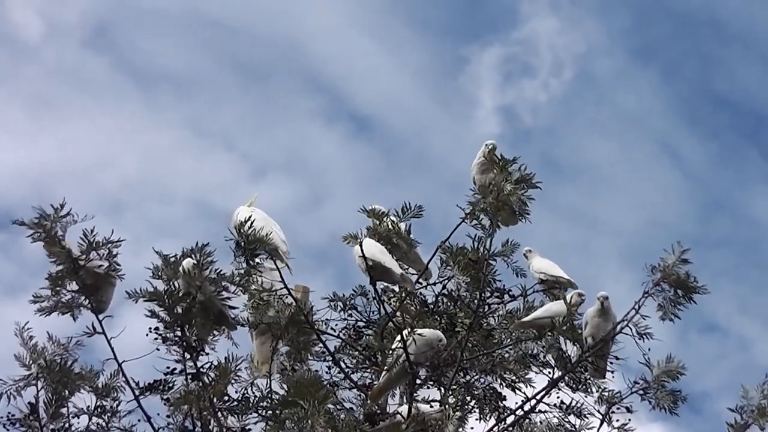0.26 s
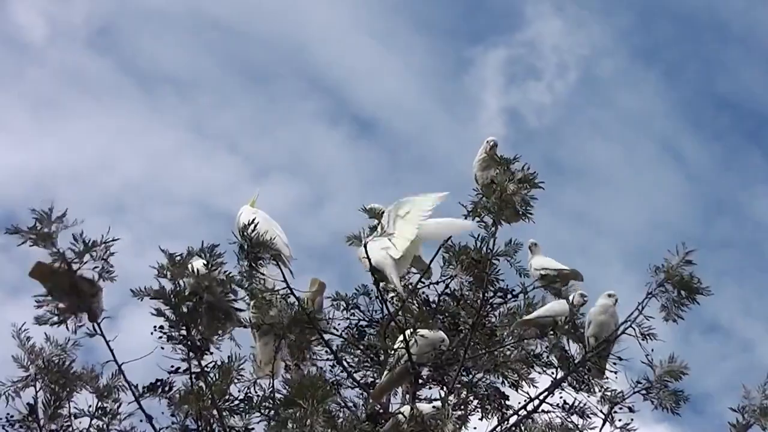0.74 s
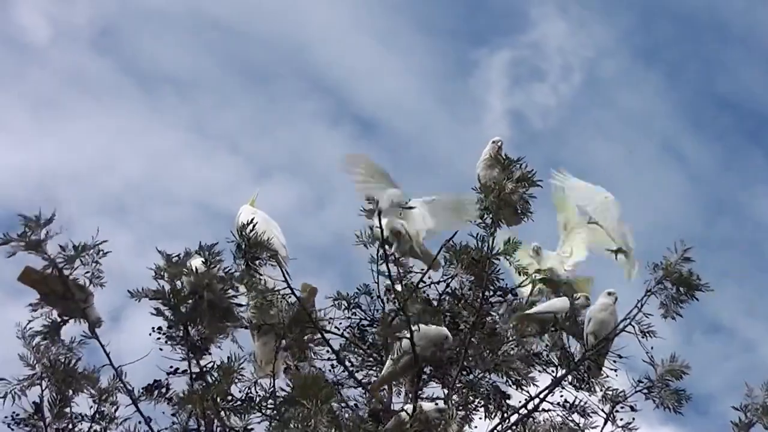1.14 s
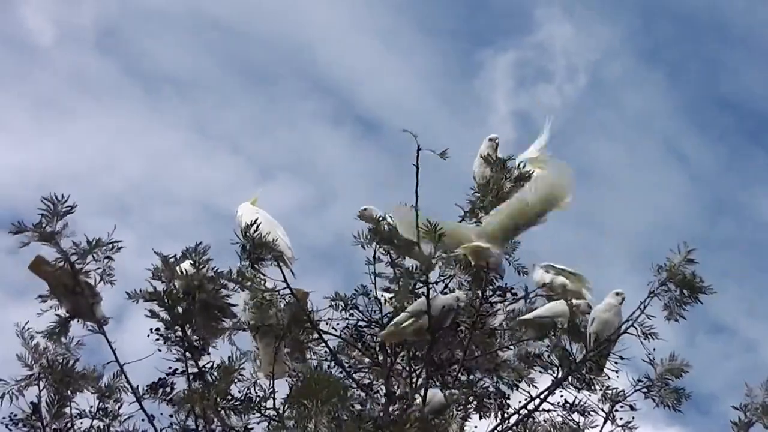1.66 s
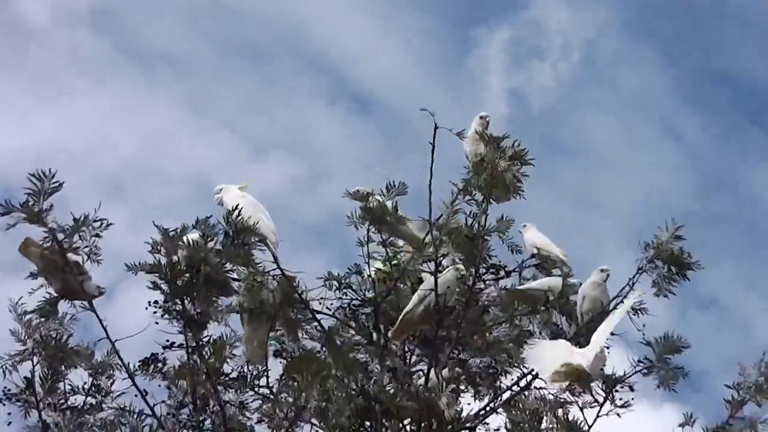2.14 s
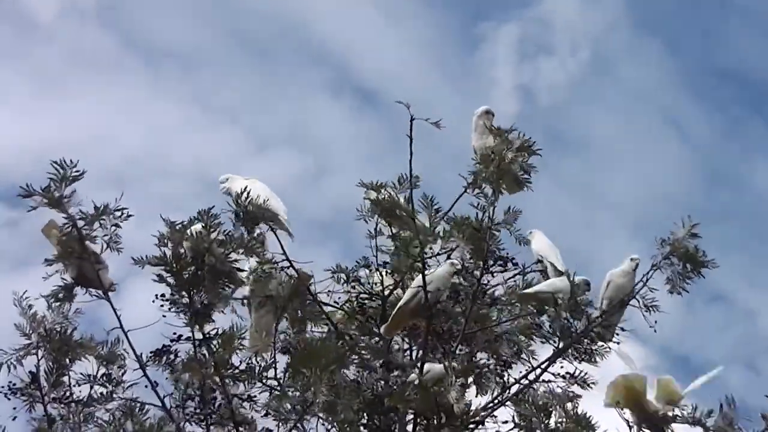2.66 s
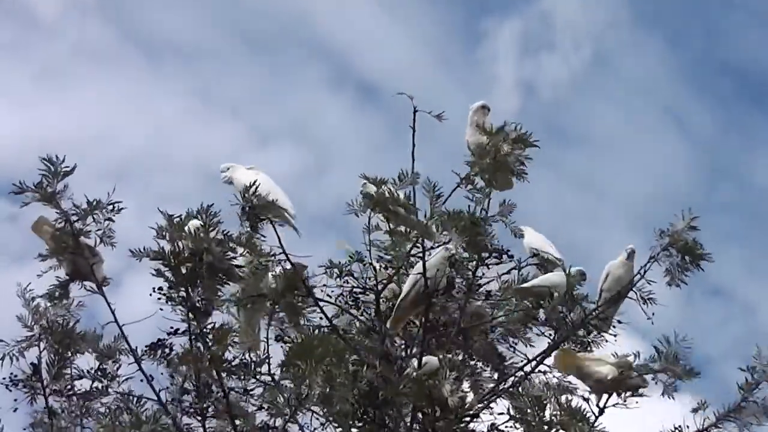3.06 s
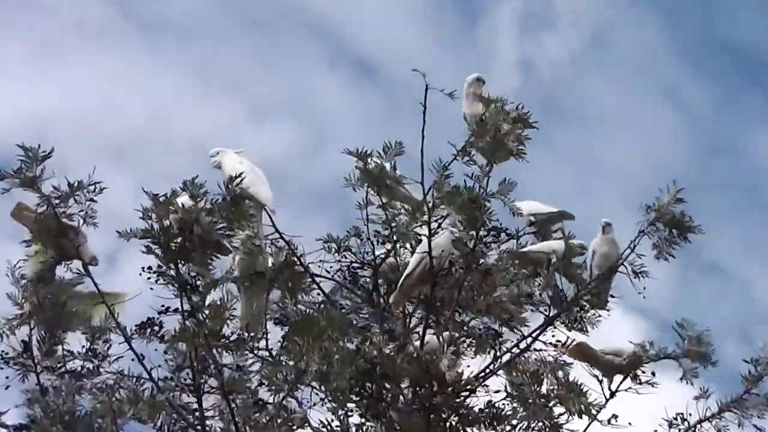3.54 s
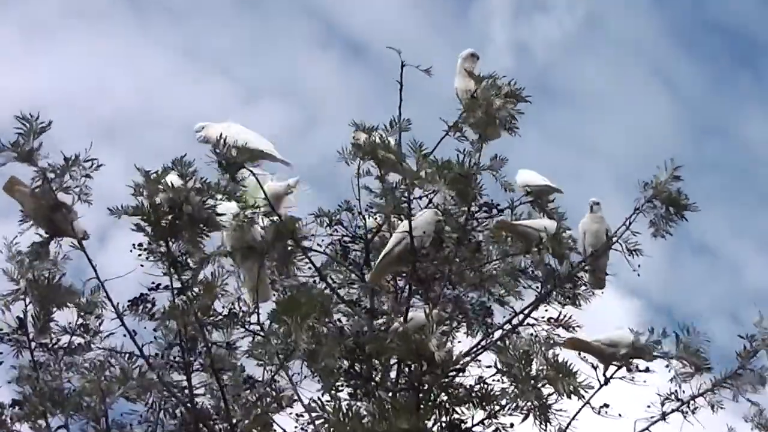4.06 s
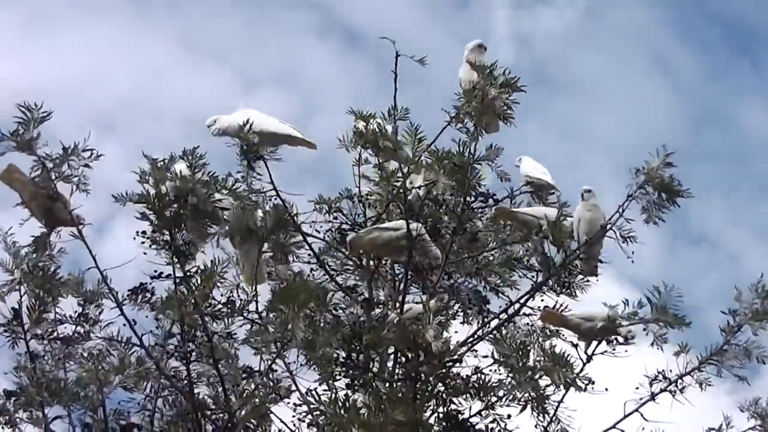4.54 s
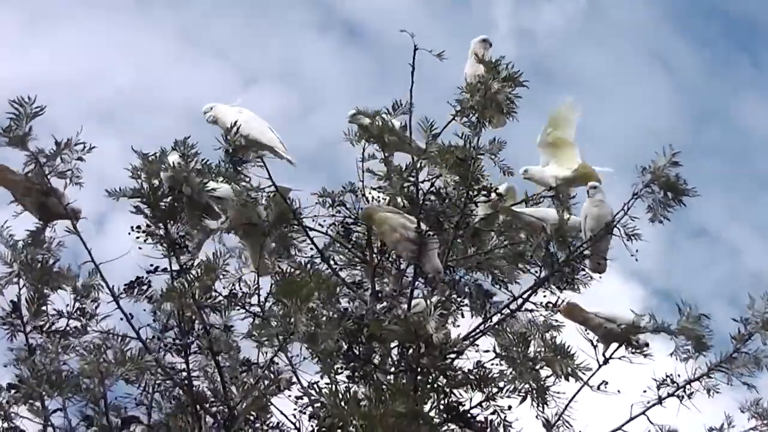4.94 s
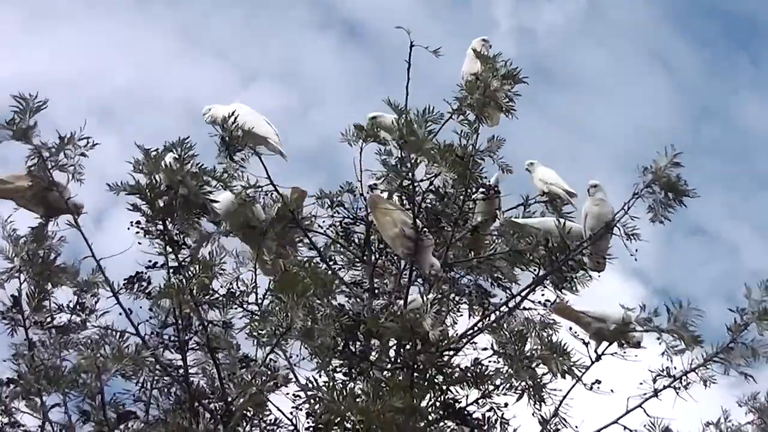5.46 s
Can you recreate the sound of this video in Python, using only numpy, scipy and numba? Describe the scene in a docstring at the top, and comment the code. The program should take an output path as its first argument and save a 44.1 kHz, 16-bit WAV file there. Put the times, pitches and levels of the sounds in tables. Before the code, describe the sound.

White cockatoos in a tree give six harsh, rasping screeches, with pods cracking in bills, a cracked squeal and soft outdoor murmur.

```python
"""White cockatoos screech harshly six times in a tree, made from uneven pulses and gated noise in a throat.
A squeal that cracks and a faint falling whistle are sine tones; hisses and a far rasp are bands of noise.
Feeding makes short noise bursts: bills crack pods, bits knock on wood, and something nibbles faintly.
Echoes and a diffuse tail surround the birds. Under them lie murmur and leaf rustle made of noise,
and the sine hum of a far engine and of traffic."""
import sys
import numpy as np
from scipy import signal
from scipy.fft import rfft, irfft, next_fast_len
from scipy.io import wavfile
from scipy.ndimage import uniform_filter1d
from numba import njit

SR = 44100
rng = np.random.default_rng(int(sys.argv[2]) if len(sys.argv) > 2 else 0)


def file_out(sig):
    """Save sig as 16-bit WAV at sys.argv[1]."""
    # one column per channel
    cols = np.atleast_2d(sig).T
    # limit, then scale
    lim = np.clip(cols, -1, 1)
    pcm = np.round(lim * 32767).astype(np.int16)
    wavfile.write(sys.argv[1], SR, pcm)


N = 251370
TIME = np.arange(N) / SR


def from_db(db):
    """Turn decibels into a gain."""
    return 10 ** (np.asarray(db) / 20)


def rms_one(x):
    """Scale a sound to an average (rms) level of 1."""
    return x / np.sqrt(np.mean(x ** 2) + 1e-20)


def in_time(rows, t=TIME):
    """Read each column of a table as a curve at the times t, with straight lines between its points."""
    s, *columns = np.transpose(rows)
    return [np.interp(t, s, column) for column in columns]


def on_bins(points, size):
    """Read a table along log frequency at each frequency of a transform."""
    hz, value = np.transpose(points)
    bin_hz = np.arange(size // 2 + 1) * SR / size
    return np.interp(np.log(bin_hz + 1), np.log(hz), value)


def colour(x, spectrum):
    """Strengthen or weaken each frequency by a table of (pitch_hz, level_db)."""
    size = next_fast_len(x.shape[-1])
    return irfft(rfft(x, size) * from_db(on_bins(spectrum, size)), size)[..., :x.shape[-1]]


def cut(x, hz, kind, order=2):
    """Keep the lows, the highs or a band with a Butterworth filter."""
    sections = signal.butter(order, np.clip(hz, 10, .45 * SR), kind, fs=SR, output="sos")
    return signal.sosfilt(sections, x + 1e-18)


def drift(rate_hz, size=N):
    """Random wandering with spread 1; movements faster than the rate grow weaker."""
    padded = next_fast_len(size + SR // 4)
    hz = np.arange(padded // 2 + 1) * SR / padded
    smooth = rfft(rng.standard_normal(padded)) / (1 + (hz / rate_hz) ** 2)
    return rms_one(irfft(smooth, padded))[:size]


def even(x, size=900):
    """Hold the short-term level at 1, averaged over a number of samples."""
    return x / np.sqrt(np.abs(uniform_filter1d(x ** 2, size)) + 1e-14)


def phase_of(hz):
    """Add up a pitch curve into the running phase of a vibration."""
    return 2 * np.pi * np.cumsum(hz) / SR


def sounding(start, length, t=TIME, fade_s=.005):
    """Gain 1 while a sound lasts, with short fades outside it."""
    return np.clip(1 + np.minimum(t - start, start + length - t) / fade_s, 0, 1)


def envelope(start, length, attack, release, t=TIME):
    """Gain of a call: it eases up to full level, holds, and drops ever faster."""
    edge_db = 21   # the call starts and ends this far under its full level
    rising = np.clip(1 - (t - start) / attack, 0, 1)
    falling = np.clip(1 - (start + length - t) / release, 0, 1)
    return from_db(-edge_db * (rising ** 2 + falling ** 2)) * sounding(start, length, t)


def stereo_noise(spectrum):
    """Noise from all around: its likeness on the two sides depends on frequency, highest in the bass."""
    # how alike left and right are: (pitch_hz, likeness 0-1)
    side_likeness = [(60, 0.96), (120, 0.8), (240, 0.23), (480, 0.55), (950, 0.56), (1890, 0.51),
                     (3770, 0.17), (7520, 0.31), (15000, 0.22)]
    size = next_fast_len(N)
    alike = np.clip(on_bins(side_likeness, size), 0, 1)
    mid, side = rfft(rng.standard_normal((2, size)))
    both = np.sqrt(1 + alike) * mid + np.sqrt(1 - alike) * side * [[1], [-1]]
    return rms_one(colour(irfft(both, size)[:, :N], spectrum))


def outdoor_air():
    """Far murmur and leaf rustle: two coloured noises whose levels drift and flutter."""
    # colour of the murmur, then of the leaves: (pitch_hz, level_db)
    murmur_colour = [(20, -8), (38, -6), (52, 0.4), (80, -3), (110, -6), (160, -8), (230, -5), (300, -12),
                     (420, -7), (600, -7), (800, -10), (1400, -12), (2000, -15), (2450, -25), (3600, -45)]
    leaf_colour = [(1290, -21), (2200, -8), (2750, -3.5), (4720, 1.5), (5760, 0), (7640, 0.5), (13200, -7),
                   (15200, -10), (16000, -3)]
    # level of the air, before its flutter: (time_s, murmur_db, leaves_db)
    air_levels = [(0, -53.5, -59.5), (1.4, -51.5, -56.5), (2.2, -52, -56), (4.8, -52.5, -56.5),
                  (5.15, -55.5, -61.5), (5.7, -55, -58)]
    murmur_db, leaf_db = in_time(air_levels)
    murmur = stereo_noise(murmur_colour) * from_db(murmur_db + drift(33))
    leaves = stereo_noise(leaf_colour) * from_db(leaf_db + 2 * drift(50))
    return murmur + leaves


def far_engine():
    """A far engine gathers speed and fades: sines at multiples of its turning rate."""
    # overall level of the engine: (time_s, level_db)
    engine_levels = [(0, -72), (.55, -57.5), (2.2, -53.5), (2.6, -58), (3.3, -58), (3.9, -70), (5.7, -70)]
    # its tones, relative to that level: (multiple of the turning rate, level_db)
    engine_tones = [(3, -8.5), (4, -3)]
    engine_db, = in_time(engine_levels)
    turns_per_s = 33.5 + .67 * TIME
    turn = phase_of(turns_per_s * (1 + .002 * drift(2)))
    tones = sum(from_db(engine_db + db + drift(2.4)) * np.sin(k * turn) for k, db in engine_tones)
    return np.sqrt(2) * tones   # a sine's peak is this much above its rms level


def traffic_drone():
    """A low drone of traffic: sines whose pitch and level slowly wander."""
    # tones of the drone, around which they wander: (pitch_hz, level_db)
    drone_tones = [(51.5, -65.5), (62, -68)]
    tones = 0
    for hz, db in drone_tones:
        gain = from_db(db + 2.5 * drift(1))
        tones = tones + gain * np.sin(phase_of(hz * (1 + .008 * drift(2))))
    return np.sqrt(2) * tones   # a sine's peak is this much above its rms level


def surroundings(x, tail_db, t60_s, build_s=.0036, width=.69):
    """Branches, ground and walls give distinct echoes; trees and ground scatter a diffuse, fading tail."""
    # echoes: (delay_s, level_db)
    distinct_echoes = [(.0034, -68), (.0071, -11), (0.0112, -14.5), (.034, -20.5), (.058, -24), (.087, -27)]
    # colour of the diffuse tail: (pitch_hz, level_db)
    tail_spectrum = [(300, -1), (1200, 2.5), (3500, 7), (7000, 9.5), (14000, -3)]
    age = np.arange(SR) / SR
    fading = from_db(-60 * age / t60_s) * (1 - np.exp(-age / build_s))
    mid, side = colour(rng.standard_normal((2, SR)), tail_spectrum) * fading
    side = cut(side, 1260, "high", order=1)   # long waves reach both sides alike
    response = rms_one(mid + width * side * [[1], [-1]]) * from_db(tail_db) / np.sqrt(SR)
    for delay, db in distinct_echoes:
        for channel, lag in enumerate(rng.integers(0, 4, 2)):   # lag in samples
            response[channel, int(delay * SR) + lag] += from_db(db)
    return signal.fftconvolve(x[None], response, axes=1)[:, :N]


def two_sides(x):
    """Left and right hear the bass alike and the treble a little differently, by a turned side signal."""
    side_colour = [(1200, -40), (2500, -2), (5000, -17), (8000, 2)]   # (pitch_hz, relative_db)
    side = colour(x, side_colour) * from_db(-13)
    quarter_turned = np.imag(signal.hilbert(side, next_fast_len(N))[:N])
    return x + quarter_turned * [[1], [-1]]


def burst(start_s, peak_db, band_hz, t60_s, grain_db, crack_db=0):
    """A sharp crack, then splinters of noise that die away within a band."""
    age = np.arange(SR // 6) / SR
    splinter_db = grain_db * drift(540, len(age)) - 60 * age / max(t60_s, .002)
    splinters = rng.standard_normal(len(age)) * from_db(splinter_db)
    splinters[0] += from_db(crack_db)
    grains = cut(splinters, band_hz, "band")
    out, start = np.zeros(N + len(age)), int(start_s * SR)
    out[start:start + len(age)] = from_db(peak_db) * grains / np.abs(grains).max()
    return out[:N]


def pod_snaps():
    """Pods crack in the bills: bright, very short bursts led by a strong click."""
    # snaps: (start_s, peak_db before the 1 dB lift below, pitch_hz of the band, t60_s to fade by 60 dB)
    snap_table = [(0.152, -38, 7240, 0.028), (1.2254, -33.5, 8500, 0.025), (1.3963, -38, 8900, 0.025),
                  (1.6456, -41, 8200, 0.022), (2.143, -35.5, 7500, 0.025), (2.1685, -31, 9260, 0.025),
                  (2.1915, -32, 8400, 0.025), (2.2094, -35, 8000, 0.022), (2.2557, -21.5, 8800, 0.025),
                  (2.9073, -37, 6760, 0.025), (2.9483, -31.5, 7650, 0.027), (3.2974, -28.5, 7000, 0.04),
                  (3.6002, -37, 5870, 0.034), (4.4468, -31.5, 5100, 0.025), (4.6587, -31.5, 6600, 0.02),
                  (4.8856, -34.5, 7900, 0.02), (5.28, -35, 6640, 0.015)]
    return sum(burst(s, db + 1, [hz * .78, hz * 1.18], t60, grain_db=3, crack_db=19)
               for s, db, hz, t60 in snap_table)


def wood_knocks():
    """Bits drop and knock on wood: duller bursts that ring a little longer."""
    # knocks: (start_s, peak_db before the 1 dB cut below, pitch_hz of the band)
    knock_table = [(1.23, -37, 660), (3.594, -35, 640), (3.81, -37.5, 590), (4.149, -37.5, 826),
                   (4.446, -29.5, 1120), (4.583, -46, 565), (4.659, -40, 1290), (4.708, -39, 579),
                   (4.839, -46, 620)]
    return sum(burst(s, db - 1, [hz * .62, hz * 1.39], .061, grain_db=5, crack_db=15)
               for s, db, hz in knock_table)


def nibbling(count=26):
    """Faint nibbling: small grainy bursts at random moments and of random strength."""
    return sum(burst(when * N / SR, -49 + 5 * strength, [5500, 9500], .027, grain_db=14)
               for when, strength in rng.random((count, 2)))


def hiss(start, length, level_db, low_hz, high_hz, grain_db, edge_s=.024):
    """A puff of grainy turbulence in a bird's bill, within one band."""
    grainy = rng.standard_normal(N) * from_db(grain_db * drift(300))
    air = cut(grainy, [low_hz, max(high_hz, low_hz + 100)], "band")
    return rms_one(air) * from_db(level_db) * envelope(start, length, edge_s, edge_s)


def far_rasp():
    """A faint rasp from a far bird: one puff of noise."""
    # the rasp: (start_s, length_s, level_db, low_edge_hz, high_edge_hz)
    rasp_puff = (4, 0.16, -59.5, 3300, 5200)
    return hiss(*rasp_puff, grain_db=.5)


def bill_hisses():
    """Thin hisses at the bill during the first screech: narrow puffs of noise."""
    # puffs: (start_s, length_s, level_db, low_edge_hz, high_edge_hz)
    hiss_puffs = [(.54, 0.091, -47, 4150, 4800), (0.598, .085, -52.5, 8050, 8750),
                  (0.698, 0.12, -51, 8000, 8700), (0.801, 0.05, -41, 7860, 8750)]
    return sum(hiss(*puff, grain_db=2) for puff in hiss_puffs)


def whistle():
    """A farther bird whistles one falling note: a sine with a weak octave."""
    start_s, length_s, level_db, octave_db = .08, .13, -46.5, -22
    first_hz, fall_hz_per_s = 1870, 2900
    hz = first_hz - fall_hz_per_s * np.clip(TIME - start_s, 0, length_s)
    phase = phase_of(hz * (1 + .011 * drift(100)))
    gain = from_db(level_db) * envelope(start_s, length_s, attack=.048, release=.055)
    return (np.sin(phase) + from_db(octave_db) * np.sin(2 * phase)) * gain


def squeal():
    """A clear tone; where it cracks, a second vibration chokes it, mixes with it and makes sum tones."""
    # pitch of the main tone, before its waver: (time_s, pitch_hz)
    squeal_pitch = [(4.045, 2085), (4.113, 2072), (4.157, 2172), (4.203, 2041), (4.225, 2036)]
    # partials of the main tone: (multiple of the pitch, relative_db)
    squeal_partials = [(1, -2), (2, -8), (3, -16), (4, -33)]
    # cracks into a lower vibration, levels before the final gain:
    # (start_s, length_s, pitch_hz, sum_tone_db, lower_tone_db, main_tone_loss_db)
    crack_table = [(4.1, .03, 1015, -47, -70, 15), (4.204, .054, 965, -46, -43, 3)]
    start_s, length_s, attack_s, release_s = 4.034, .22, .01, .022
    full_db, swell_db, swell_s = -35, 6.5, .045   # it swells up to the full level, before the final gain
    crack_sag_hz_per_s, crack_edge_s = 2100, .018

    hz, = in_time(squeal_pitch)
    strain = np.interp(TIME, [4.1, 4.24], [.2, 2])   # the note starts steady and frays
    phase = phase_of(hz * (1 + .0076 * strain * drift(330)))
    tone = sum(from_db(db) * np.sin(k * phase) for k, db in squeal_partials)
    level_db = full_db - swell_db * np.clip(1 - (TIME - start_s) / swell_s, 0, 1)
    tone = tone * from_db(level_db) * envelope(start_s, length_s, attack_s, release_s)
    for start, length, second_hz, sum_db, lower_db, choke_db in crack_table:
        sagging_hz = second_hz - crack_sag_hz_per_s * (TIME - start)
        second = phase_of(sagging_hz * (1 + .0237 * drift(196)))
        crack = from_db(lower_db) * np.sin(second) + from_db(sum_db) * np.sin(phase + second)
        grip = envelope(start, length, crack_edge_s, crack_edge_s)
        tone = tone * from_db(-choke_db * np.sqrt(grip)) + grip * crack
    return 1.27 * tone * from_db(strain * drift(97))


@njit
def windpipe(x, period, feedback):
    """The wave runs to and fro in a pipe of changing length; period is each round trip in samples."""
    y = x.copy()
    for i in range(len(x)):
        back = i - period[i]
        if back >= 1:
            j = int(back)
            y[i] += feedback * (y[j] + (back - j) * (y[j + 1] - y[j]))
    return y


def moving_resonance(x, hz, width_hz):
    """What a resonance lets through while its centre moves."""
    carrier = np.exp(1j * phase_of(hz))
    return 2 * np.real(cut(x / carrier, width_hz / 2, "low", order=1) * carrier)


def gesture(call, t):
    """Controls of one screech: pitch and gape arch over the call, and the open bill brightens it."""
    # two long screeches falter midway: (time_s, half_length_s, loss_db, further_top_loss_db)
    falter_table = [(0.688, 0.03, 2, 8), (2.396, 0.039, 4, 1.5)]
    # the first screech breaks into a lower register, sinks and clears: (time_s, pitch_hz, roughness 0-1)
    low_register = [(.752, 646.7, 0.84), (.81, 627.6, 0.61), (.836, 610, .55), (.847, 543, 0.3),
                    (.862, 530, .1)]
    chest_loss_db, top_gain_db = 3.5, 6   # as the bill opens, the lows lose share and the top gains

    (start, length, level_db, swell_db, attack, release, top_hz, climax, arch, rough,
     low_db, high_db, first_hz, last_hz, mouth_db) = call
    along = np.clip((t - start) / length, 0, 1)
    closed = np.interp(along, [0, np.clip(climax, 0, 1), 1], [-1, 0, 1]) ** 2
    level_db = level_db + swell_db * (along - .5)
    low_db = low_db + chest_loss_db * closed
    high_db = high_db - top_gain_db * closed
    for s, half_length, loss_db, top_loss_db in falter_table:
        dip = np.exp(-((t - s) / half_length) ** 2)
        level_db = level_db - loss_db * dip
        high_db = high_db - top_loss_db * dip

    hz = top_hz * (1 - arch * closed) * (1 + .02003 * drift(40, len(t)))   # the strained pitch wanders
    break_s = low_register[0][0]
    broken = (start < break_s) & (t > break_s)
    broken_hz, broken_rough = in_time(low_register, t)
    hz = np.where(broken, broken_hz, hz)
    rough = np.where(broken, broken_rough, rough)
    gain = from_db(level_db) * envelope(start, length, attack, release, t)
    mouth_hz = first_hz + (last_hz - first_hz) * along
    return gain, hz, rough, low_db, high_db, mouth_hz, mouth_db


def syrinx(hz, rough):
    """The voice organ beats chaotically: uneven pulses mixed with noise that the beat gates."""
    size = len(hz)
    phase = phase_of(hz)
    # a growing phase shift smears each pulse over time
    pulses = rms_one(sum(np.cos(k * phase + .2 * k * k) / np.sqrt(k) for k in range(1, 9)))
    air = rms_one(rng.standard_normal(size) * (1 + .88 * np.cos(phase)))
    # no two pulses are equally strong, and the membranes flap at a slower, uneven rate
    shimmer = from_db(2 * rough * 3 * drift(850, size))
    flap_hz = 265 * (1 + .291 * drift(119, size))
    flap = 1 + np.clip(2 * rough * .28, 0, 1) * np.cos(phase_of(flap_hz))
    return even((pulses * (1 - rough) + 1.98 * rough * air) * shimmer, size=220) * flap


def gape(voice, low_db, high_db):
    """The opening of the bill shifts power between chest, middle and top."""
    low, high = from_db(low_db), from_db(high_db)
    middle = np.sqrt(np.clip(1 - low ** 2 - high ** 2, .06, 1))
    chest = colour(voice, [(1500, 0), (1700, -6), (2100, -50)])
    top = colour(voice, [(3800, -50), (4500, -6), (5000, 0)])
    return low * even(chest) + middle * even(voice - chest - top) + high * even(top)


def screech(call, throat):
    """One screech: the chaotic beat of the syrinx rings in windpipe, mouth and throat."""
    start, length = call[:2]
    span = slice(int((start - .03) * SR), int((start + length + .03) * SR))
    t = TIME[span]
    gain, hz, rough, low_db, high_db, mouth_hz, mouth_db = gesture(call, t)
    rough = np.clip(rough, .05, 1)
    jitter = drift(622, len(t)) + .4065 * drift(65.3, len(t))
    hz = hz * (1 + .0699 * rough * jitter)
    voice = windpipe(syrinx(hz, rough), SR / hz, .21)
    voice = voice + from_db(mouth_db) * moving_resonance(voice, mouth_hz, width_hz=550)
    voice = cut(colour(voice, throat), 540, "high", order=4)
    out = np.zeros(N)
    out[span] = even(gape(voice, low_db, high_db), size=400) * gain
    return out


def screeches():
    """All the harsh screeches, each with its own colour of throat and bill."""
    # calls: (start_s, length_s, level_db at the middle, swell_db from start to end, attack_s, release_s,
    # pitch_hz at the climax, climax place 0-1, share by which the pitch is lower at the ends,
    # roughness 0-1, share_db under 1.7 kHz and share_db over 4.5 kHz at the climax,
    # mouth_start_hz, mouth_end_hz, mouth_db: resonance at start and end, and its strength)
    screech_calls = [(0.487, .372, -35.5, 5.5, 0.039, .01, 1060, .7, .05, 0.68, -4.5, -12, 1860, 2500, 3),
                     (2.271, .25, -24, -2, .052, 0.042, 1351, 0.35, 0.23, 0.56, -4.5, -9.5, 4500, 2500, -4),
                     (2.633, 0.17, -20.5, -1.5, 0.053, 0.039, 1152, 0.48, -.07, 0.56, -9.5, -5.6, 2300, 4040, -1.5),
                     (2.979, 0.25, -22.5, 0, 0.036, 0.041, 1250, 0.4, .08, .54, -6.5, -7.5, 3500, 2300, -11),
                     (3.384, .087, -23, -3.5, 0.037, 0.031, 1206, .5, .07, 0.63, -4.5, -8.5, 2580, 2686, -8),
                     (5.424, 0.11, -26.5, 1, 0.051, .055, 1215, 0.58, .06, 0.57, -4, -4, 3670, 4030, -2)]
    # one list for each call, before the gape shifts its balance: (pitch_hz, level_db)
    throat_colours = [
        [(400, -15), (580, 0), (1000, 2.5), (1500, 1), (2100, -1.5), (2600, -12.5), (3200, -3.5), (3700, -10.5),
         (4500, -4.5), (5700, -6), (6800, -11), (8400, -17), (9400, -19), (13000, -35)],
        [(450, -14), (660, -4.5), (1000, -1.5), (1270, 2), (1800, -8.5), (2600, -9.5), (3200, -10.5),
         (4200, -12.5), (4700, -9), (6000, -9.5), (7700, -14.5), (9000, -21), (13000, -41)],
        [(450, -35), (700, -9), (950, -5.5), (1300, -15.5), (1750, -8), (2300, 4), (3400, 3.5), (4400, 0),
         (5400, -3.5), (7000, -4.5), (8300, -14), (10000, -19), (13000, -55)],
        [(450, -36), (660, -9), (950, -6), (1240, -4.5), (1750, -1), (2400, -3.5), (3100, -8), (3700, -2.5),
         (4400, -10.5), (5100, -2.5), (6900, -9.5), (8500, -17), (13000, -39.5)],
        [(450, -36), (660, -7), (1000, -5.5), (1450, 0), (2000, -5), (2800, -11), (3500, -5), (4200, -12),
         (5000, 0.5), (7000, -7), (8600, -13.5), (13000, -44)],
        [(500, -35), (660, 3), (790, -14), (900, 2), (1030, -2.5), (1180, -4), (1550, -3.5), (1950, -4),
         (3700, 1.5), (5800, -5.5), (7000, -3), (9000, -14), (13000, -50)],
    ]
    return sum(screech(call, throat) for call, throat in zip(screech_calls, throat_colours))


def scene():
    """The birds in the tree, squealer and farther birds with more echo, and the open air."""
    background = outdoor_air() + far_engine() + traffic_drone()
    feeding = pod_snaps() + wood_knocks() + nibbling()
    tree = screeches() + bill_hisses() + feeding
    squealer = squeal()
    far = whistle() + far_rasp()
    direct = two_sides(tree) + far + squealer * from_db([[-6], [6]])   # the squeal is on the right
    near_echo = surroundings(tree, tail_db=-15.5, t60_s=.43)
    far_echo = surroundings(squealer + far, tail_db=-9, t60_s=.78)
    return direct + near_echo + far_echo + background


def record(dry):
    """The highest peaks are rounded and the top is cut steeply."""
    ceiling, cutoff_hz = .58, 15900
    rounded = ceiling * np.tanh(dry / ceiling)
    return signal.sosfilt(signal.ellip(10, .1, 80, cutoff_hz, fs=SR, output="sos"), rounded)


dry = scene()
out = record(dry)
file_out(out)
```